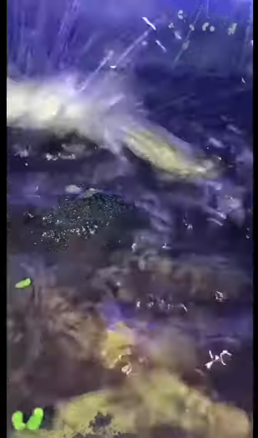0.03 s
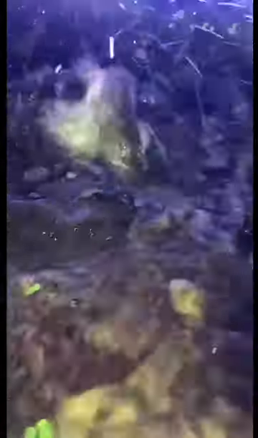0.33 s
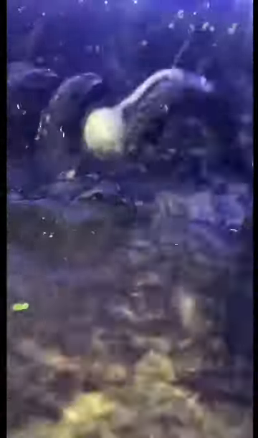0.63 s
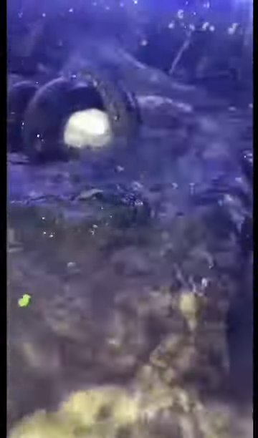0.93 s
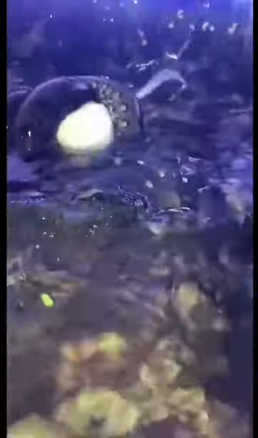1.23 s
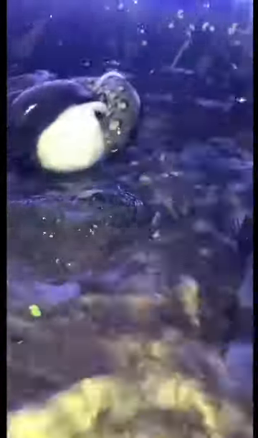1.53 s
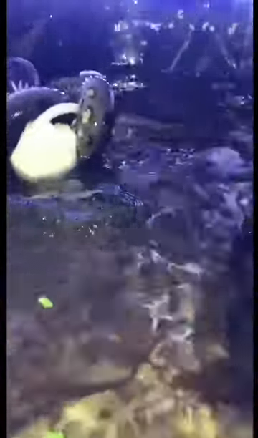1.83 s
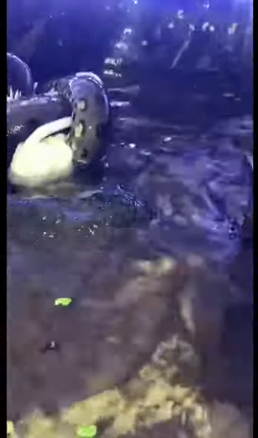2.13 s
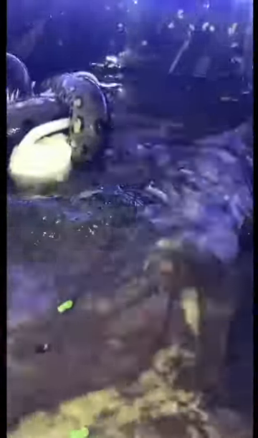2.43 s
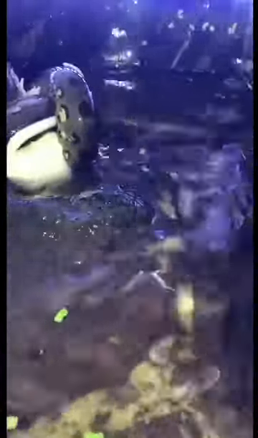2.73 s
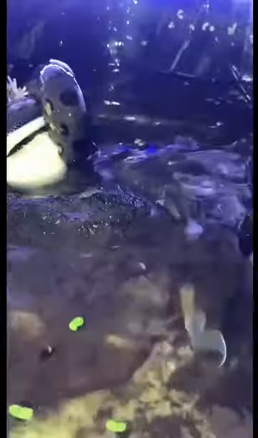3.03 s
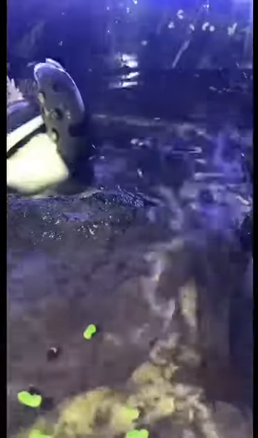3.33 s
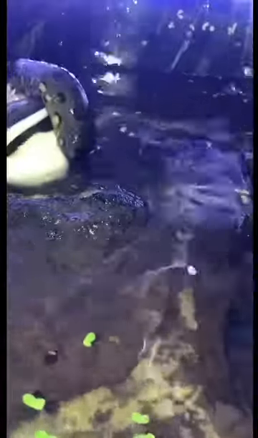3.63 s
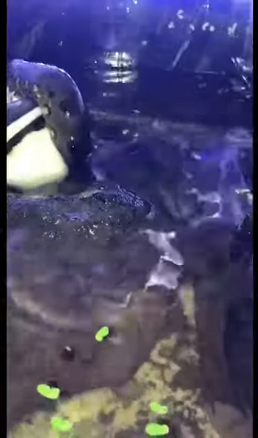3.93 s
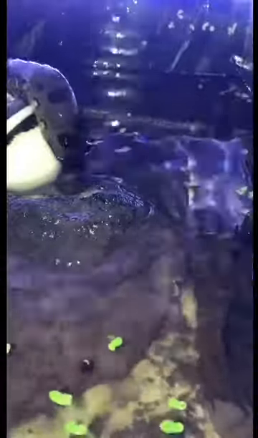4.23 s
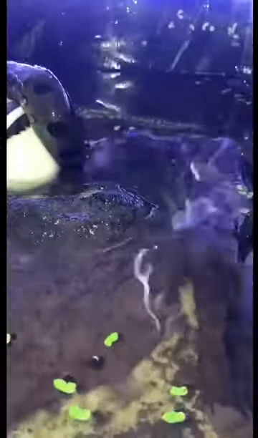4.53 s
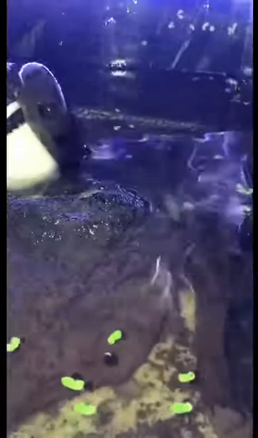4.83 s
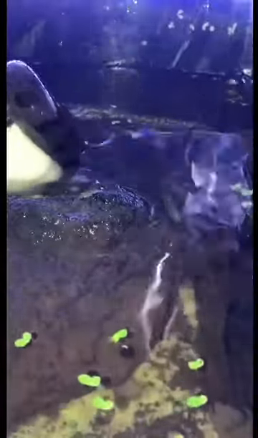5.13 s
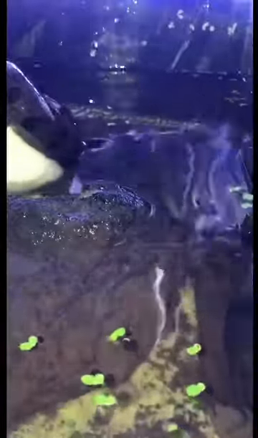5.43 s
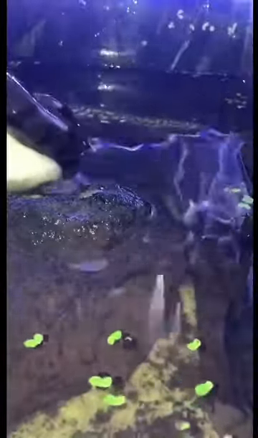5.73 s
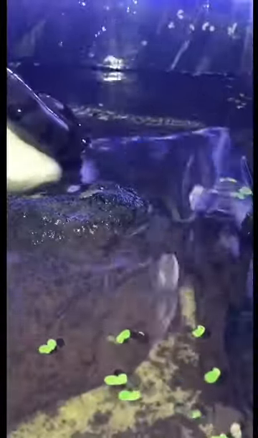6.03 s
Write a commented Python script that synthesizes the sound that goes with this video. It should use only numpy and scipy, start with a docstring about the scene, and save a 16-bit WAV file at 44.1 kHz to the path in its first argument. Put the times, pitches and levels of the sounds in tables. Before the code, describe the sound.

Right at the start, a snake strikes in a small walled pond, heard close up: a loud, sloshing splash breaks into bright spray and bubbles, with several quick thrashes in the first 0.4 seconds. From about 0.6 to 0.8 seconds a high, sputtering hiss comes in spurts, with a whistling ring. Around 1 second the thrown water falls back with a plop, a wet slap and a brief shower of droplets, thinning out by 1.5 seconds. The rest is much quieter. The coiling body makes a soft, low bump just after 2 seconds. A few wet clicks come from 3.3 seconds, ending in a sharp, squeaky one at 3.6. Faint drips tick on sparsely, with small bumps near 4.8 and 6.2 seconds, and ripples lap very faintly. The close walls add a short ring, and low machinery rumbles quietly throughout.

```python
"""A small walled pond, close up. A snake strikes: water sloshes, traps ringing bubbles and tears into spray.
A second hiss follows in spurts, ringing in narrow resonances. The thrown water plops and drips back,
with a few wet clicks and soft bumps of the coiling body, and ripples lap at the wall.
The enclosure rings briefly; machinery rumbles quietly behind it all."""
import sys
import numpy as np
from scipy import signal
from scipy.fft import rfft, irfft, next_fast_len
from scipy.io import wavfile
from scipy.ndimage import map_coordinates

SR = 44100
rng = np.random.default_rng(int(sys.argv[2]) if len(sys.argv) > 2 else 0)


def dump_mix(stems):
    """Bounce the given channels to the path in sys.argv[1] as a 16-bit WAV at rate SR."""
    frames = np.atleast_2d(stems).T  # one column per channel
    limited = np.clip(frames, -1, 1)  # hard clip at full scale
    pcm = np.round(limited * 32767).astype(np.int16)
    wavfile.write(sys.argv[1], SR, pcm)


N = 277212
TIME_S = np.arange(N) / SR
AGE_S = np.arange(SR // 3) / SR  # time within one short event

# Enclosure resonances, lowest first. Each row: centre in Hz, width in Hz, gain in dB.
ENCLOSURE_MODES = [(1002, 26, 5.5), (1185, 19, -4), (1613, 70, -7), (2268, 150, -1), (3070, 43, -3.5),
                   (3250, 19, -1), (3450, 160, 0), (3990, 44, -2.5)]
# Resonances of the ringing hiss. Each row: centre in Hz, width in Hz, gain in dB.
HISS_MODES = [(3040, 210, -24.5), (4540, 250, -25.5), (5430, 90, -18.5), (5968, 190, -2.5), (6180, 78, 6),
              (6360, 140, -4.5), (6900, 120, -14)]


def strike():
    """The lunge shoves water aside; each thrash folds in air and throws spray and mist. Foam simmers on."""
    # Each row: start in seconds, hold in seconds, spray in dB, mist in dB, churn in dB.
    thrashes = [(0.0, 0.015, -27, -27, -19.5), (.025, 0.055, -19, -23.5, -25.5),
                (.08, 0.044, -22.5, -24, -26), (.124, 0.053, -16, -24, -25.5), (.195, 0.043, -23, -33, -40),
                (.221, .022, -18, -36.5, -38), (.27, 0.017, -24, -38.5, -29.5),
                (.393, .025, -36.5, -34, -29), (.974, .014, -48, -56, -31)]
    # Spectra. Each row: frequency in Hz, density in dB.
    spray_spectrum = [(1800, -40), (3000, -4), (4000, -7), (4600, -2), (5400, -0.5), (6500, -1.5),
                      (7500, -5.5), (10000, -31)]
    mist_spectrum = [(4000, -35.5), (6500, -10), (7500, -5.5), (9300, -2.5), (10500, -7.5), (13000, -7),
                     (16000, -7)]
    slosh_spectrum = [(20, -46.5), (40, -23), (60, -4.5), (85, -7.5), (130, -0.5), (190, -5.5), (250, -8),
                      (300, -16), (370, -10), (500, -21), (700, -19), (1100, -39)]
    spray_env, mist_env, churn_env = bursts(thrashes, attack_s=.0073, fall_db_per_s=520)
    foam_env = burst(0, hold_s=.795, attack_s=.0073, fall_db_per_s=480.5)
    spray = froth(per_s=1500, hz=5076, octaves=.4, cycles=18) + .38 * patter(per_s=5000, spread_db=3)
    mist = .87 * patter(per_s=5200, spread_db=4.5) + froth(per_s=1500, hz=8550, octaves=.34, cycles=14)
    slosh = amp(-25.5 - 38.5 * TIME_S) * coloured(rng.standard_normal(N), slosh_spectrum)
    return (np.hypot(spray_env, amp(-52) * foam_env) * coloured(spray, spray_spectrum)
            + np.hypot(mist_env, amp(-50.5) * foam_env) * coloured(mist, mist_spectrum)
            + np.hypot(churn_env, amp(-41.5) * foam_env) * churn() + slosh)


def churn():
    """Larger bubbles and slaps, ringing in the enclosure."""
    # Each row: frequency in Hz, density in dB.
    spectrum = [(200, -21.5), (400, -1.5), (550, -13.5), (850, -18), (1000, -11.5), (1600, -4), (2800, -2),
                (4000, -16), (7000, -40)]
    water = froth(per_s=550, hz=1737, octaves=.6, cycles=14) + 1.3 * patter(per_s=2200, spread_db=4.5)
    return unit(coloured(water, spectrum) + .49 * unit(resonate(water, ENCLOSURE_MODES)))


def sheets():
    """A water sheet stretches and tears: droplet size slides, and with it the pitch of a narrow hiss."""
    # Each row: middle in seconds, length in seconds, start pitch in Hz, end pitch in Hz, level in dB.
    tears = [(0.034, 0.03, 7600, 7500, -20), (.052, 0.068, 6500, 5120, -15.5),
             (0.083, 0.069, 8850, 10420, -21.5), (0.131, 0.087, 8330, 9130, -24.5),
             (.152, 0.072, 4357, 4786, -16.5), (0.241, 0.021, 5220, 5500, -16),
             (0.233, .035, 6293, 7010, -20.5), (0.29, 0.026, 5070, 5700, -27)]
    out = np.zeros(N)
    for mid_s, length_s, start_hz, end_hz, db in tears:
        pitch_hz = np.interp(TIME_S, [mid_s - length_s / 2, mid_s + length_s / 2], [start_hz, end_hz])
        swell = np.cos(np.pi * np.clip((TIME_S - mid_s) / length_s, -.5, .5))
        flutter = wobble(750) + 1j * wobble(750)
        out += amp(db) * swell * np.real(flutter * np.exp(1j * phase(pitch_hz)))
    return out


def ringing_hiss():
    """Spurts of sputtering hiss; narrow resonances and a wavering whistle take over at their height."""
    # Each row: start in seconds, attack in seconds, hold in seconds, ring in dB, sputter in dB.
    spurts = [(.53, .05, .066, -35, -34), (.597, .006, 0.065, -13.5, -25), (.656, .01, 0.024, -9.5, -28),
              (.709, .003, .018, -18.5, -19), (0.773, .012, .022, -37, -34)]
    # Each row: frequency in Hz, density in dB.
    sputter_spectrum = [(1470, -47), (2500, -20.5), (2680, -24), (3080, -3), (3800, -14), (4310, -6.5),
                        (4880, -12.5), (6200, -4), (6750, -13), (7400, -8.5), (9290, -9.5), (10200, -23.5),
                        (10900, -18), (13100, -26), (14900, -22.5), (16000, -28)]
    # Each row: centre in Hz, width in Hz, gain in dB.
    sputter_modes = [(3210, 79, -6.5), (5200, 50, -5), (6100, 75, 0), (7186, 70, -7), (7840, 43, -7.5),
                     (8506, 31, -11), (10850, 140, -18.5), (11754, 120, -21)]
    ring_env, sputter_env = np.zeros((2, N))
    for start_s, attack_s, hold_s, ring_db, sputter_db in spurts:
        ring_spurt = amp(ring_db) * burst(start_s, hold_s, attack_s, fall_db_per_s=600)
        sputter_spurt = amp(sputter_db) * burst(start_s, hold_s, attack_s, fall_db_per_s=430)
        ring_env = np.hypot(ring_env, ring_spurt)
        sputter_env = np.hypot(sputter_env, sputter_spurt)
    whistle_hz = 6210 + 170 * wobble(170)
    whistle = unit(np.sin(phase(whistle_hz)))
    cluster = resonate(rng.standard_normal(N), HISS_MODES)
    cluster = coloured(cluster, [(2000, -12.5), (5000, -1), (8000, 1), (13000, -12.5)])
    ring = unit(cluster + amp(-3) * whistle)
    impacts = patter(per_s=8300, spread_db=5) * amp(1.7 * wobble(120))
    sputter = coloured(impacts, sputter_spectrum)
    sputter += .68 * unit(resonate(rng.standard_normal(N), sputter_modes))
    return ring_env * ring * amp(1.3 * wobble(160)) + sputter_env * sputter


def bubbles():
    """Trapped air splats, then rings and glides up; it rings longer near the lowest enclosure mode."""
    # Each row: start in seconds, level in dB, pitch in Hz.
    air_pockets = [(.008, -7.5, 1547), (.092, -9.5, 1255), (0.292, -21.5, 1170), (.298, -14.5, 1595),
                   (.353, -26, 986), (0.394, -15, 2670), (.407, -19, 1136), (.416, -7.5, 1670),
                   (.478, -27.5, 3350), (.507, -29, 1130), (.716, -13.5, 1380), (.778, -23, 2138),
                   (0.9, -39.5, 2390), (.939, -21.5, 2490), (.967, -7, 626), (0.967, -19, 1015),
                   (.978, -18.5, 2300), (.986, -16, 1970), (1.025, -17, 1793), (1.053, -31, 997),
                   (1.091, -26, 2990), (1.093, -31.5, 2440), (1.137, -33.5, 2293), (1.267, -38, 3470)]
    lowest_mode_hz, sympathy_width_hz = ENCLOSURE_MODES[0][0], 140
    out = np.zeros(N)
    for start_s, db, hz in air_pockets:
        sympathy = np.exp(-((hz - lowest_mode_hz) / sympathy_width_hz) ** 2)
        pitch_hz = hz * (1 + .077 * (1 - np.exp(-AGE_S / .021)))
        ring = decay(t60_s=.035 + .04 * sympathy, attack_s=.0008) * np.sin(phase(pitch_hz))
        splat = amp(-14) * band_noise(hz, octaves=.8) * decay(t60_s=.022, attack_s=.0004)
        add(out, start_s, amp(db - 3.5) * (ring + splat))
    return out


def drops():
    """Each drop hits the surface and ticks in a band set by its size."""
    # Each row: start in seconds, level in dB, band centre in Hz.
    impacts = [(.3452, -26.5, 4030), (0.3612, -26, 6652), (.406, -20.5, 6095), (.918, -33, 10360),
               (0.9293, -31, 5798), (.9462, -23, 4298), (1.0226, -22, 4400), (1.0827, -32, 6300),
               (1.1974, -36, 6660), (1.4005, -28, 7640), (1.4614, -49, 4200), (1.5263, -49, 5900),
               (1.5592, -41.5, 13600), (1.688, -53, 9500), (1.912, -49, 13500), (2.054, -51.5, 6780),
               (2.3224, -47, 12110), (2.5075, -49, 14800), (3.9334, -43, 6200), (4.0738, -52, 9460),
               (4.214, -51.5, 9330), (4.304, -53, 3760), (4.502, -46, 2070), (4.7674, -51.5, 9354),
               (5.7425, -47, 6500), (6.2375, -42.5, 4600)]
    out = np.zeros(N)
    for start_s, db, hz in impacts:
        tick = band_noise(hz, octaves=.29) * decay(t60_s=.029, attack_s=.0004)
        add(out, start_s, amp(db - 5.5) * tick)
    return out


def clicks():
    """Sharp wet clicks, spread over all bands."""
    # Each row: start in seconds, level in dB, tilt in dB per octave, t60 in seconds.
    snaps = [(0.9643, -21, 1, 0.041), (1.022, -23, 0.5, 0.019), (1.135, -33, 3, 0.029),
             (1.2572, -30, 11.5, 0.014), (3.2625, -26.5, 0, .028), (3.409, -50, -0.5, .021),
             (3.3318, -33.5, 13.5, 0.011), (3.58, -17.5, 16.5, .013), (4.502, -51.5, -2.5, 0.031)]
    # Each row: frequency in Hz, density in dB.
    spectrum = [(300, -6), (1000, -4), (2500, 1), (4500, -7), (7000, -5), (11000, -8.5), (16000, -12.5),
                (18000, -45)]
    out = np.zeros(N)
    for start_s, db, tilt, t60_s in snaps:
        snap = shaped_noise(lambda hz: amp(along(spectrum, hz) + tilt * np.log2(hz + 300)))
        add(out, start_s, amp(db) * snap * decay(t60_s, attack_s=.00075))
    return out


def squeaks():
    """Short squeaks on the resonances of the hiss."""
    # Each row: start in seconds, level in dB, attack in seconds, t60 in seconds.
    events = [(3.525, -40.5, 0.04, 0.105), (3.58, -22, 0.00087, .022)]
    out = np.zeros(N)
    for start_s, db, attack_s, t60_s in events:
        ring = unit(resonate(rng.standard_normal(len(AGE_S)), HISS_MODES))
        add(out, start_s, amp(db) * ring * decay(t60_s, attack_s))
    return out


def bumps():
    """The coiling body nudges water and wall: a low thud under a wet slap. The first, loudest row is the plop
    of thrown water falling back."""
    # Each row: start in seconds, thud in dB, slap in dB, thud cutoff in Hz, t60 in seconds.
    nudges = [(.967, -25, -26, 480, 0.07), (1.122, -37.5, -49, 346, .096), (2.092, -29, -45, 310, .11),
              (2.161, -36.5, -75, 85.3, .22), (3.414, -44, -47, 250, 0.07), (3.581, -47, -42.5, 400, 0.064),
              (4.811, -47, -40, 400, 0.046), (6.173, -39.5, -49, 305.8, .073)]
    # Each row: frequency in Hz, density in dB.
    slap_spectrum = [(300, 5), (600, 1.5), (1000, 6), (1700, -2.5), (2500, -11), (4000, -23), (8000, -24),
                     (16000, -60)]
    out = np.zeros(N)
    for start_s, thud_db, slap_db, cutoff_hz, t60_s in nudges:
        thud = amp(thud_db) * shaped_noise(lambda hz: hz / (hz + 90) / (1 + (hz / cutoff_hz) ** 4))
        slap = amp(slap_db) * shaped_noise(lambda hz: amp(along(slap_spectrum, hz)))
        add(out, start_s, (thud + slap) * decay(t60_s, attack_s=.0025))
    return out


def settling():
    """Thrown droplets land in a brief shower and tick on, fading with the time since the throw."""
    thrown_s, start_s, fall_db_per_doubling = .7, .82, 5.5
    ticks = .7 * froth(per_s=460, hz=10000, octaves=.55, cycles=2.5)
    pings = .55 * froth(per_s=68, hz=7450, octaves=.38, cycles=6)
    crackle = .94 * patter(per_s=60, spread_db=4.5)
    droplets = coloured(ticks + pings + crackle, [(1500, -17), (4000, -6), (6500, -4), (16000, -.5)])
    doublings = np.log2(np.maximum((TIME_S - thrown_s) / (start_s - thrown_s), 1))
    droplet_env = (TIME_S > start_s) * amp(-49.5 - fall_db_per_doubling * doublings + 2.2 * wobble(40))
    shower_env = amp(-47) * burst(start_s=.925, hold_s=.055, attack_s=.015, fall_db_per_s=450)
    return droplet_env * droplets + shower_env * patter(per_s=2000, spread_db=4)


def lapping():
    """Fading ripples fold against the wall and stir the enclosure's resonances."""
    # Larger ripples. Each row: middle in seconds, level in dB.
    laps = [(1.3, -65), (1.62, -65.5), (1.87, -69), (2.52, -69.5), (4.25, -72), (4.64, -70), (5.52, -69),
            (5.97, -71)]
    lap_width_s, fall_db_per_doubling = .071, 2.5
    ripple_env = amp(-71 - fall_db_per_doubling * np.log2(np.maximum(TIME_S, 1)) + 2 * wobble(6))
    lap_env = sum(amp(db) * np.exp(-((TIME_S - mid_s) / lap_width_s) ** 2 / 2) for mid_s, db in laps)
    water = coloured(churn(), [(200, 6), (700, 10.5), (1200, -3.5), (2500, -10), (6000, -25)])
    return np.hypot(ripple_env, lap_env) * water


def near_walls(x):
    """x plus the first wall reflections, which thicken small sounds."""
    # Each row: delay in seconds, gain in dB.
    echoes = [(.0013, -12), (.0029, -10), (.0047, -16), (.0072, -18)]
    out = x.copy()
    for delay_s, db in echoes:
        add(out, delay_s, amp(db) * x)
    return out


def wall_reverb(x):
    """The close walls return a short tail that loses its treble first."""
    # Each row: frequency in Hz, t60 in seconds.
    decay_times = [(150, 0.16), (1000, .15), (3000, 0.13), (7000, 0.089), (15000, .08)]
    hz, t_s, noise = signal.stft(rng.standard_normal(SR // 2), SR, nperseg=256)
    fade = amp(-60 * t_s / along(decay_times, hz)[:, None])
    tail = signal.istft(noise * fade, SR, nperseg=256)[1]
    return signal.fftconvolve(x, tail / np.linalg.norm(tail))[:N]


def notches(x):
    """A few narrow dips colour the splashes and small sounds."""
    # Each row: centre in Hz, width in Hz, gain in dB.
    dips = [(485, 17, -6), (830, 79, -5), (1810, 60, -4.5), (10250, 300, -3.5)]
    return filtered(x, lambda hz: amp(sum(db * np.exp(-((hz - centre_hz) / width_hz) ** 2)
                                          for centre_hz, width_hz, db in dips)))


def background():
    """Low machinery rumble and faint, wavering air noise."""
    # Spectra. Each row: frequency in Hz, density in dB.
    rumble_spectrum = [(12, -61.5), (20, -29), (30, -20.5), (41, -3.5), (124, 2), (145, -1.5), (167, -16),
                       (212, -8.5), (238, -12), (290, -20), (344, -15), (445, -23), (492, -34),
                       (600, -32.5), (780, -62.5), (1320, -120)]
    air_spectrum = [(260, -31.5), (450, -1), (492, -13.5), (644, -5), (895, -11), (1010, -7.5),
                    (2160, -17.5), (3430, -17.5), (7470, -24), (9340, -24), (10400, -25.5), (15100, -19.5),
                    (16000, -26)]
    rumble = amp(-49.5) * coloured(rng.standard_normal(N), rumble_spectrum)
    air = amp(-67 + .81 * wobble(6.2)) * coloured(rng.standard_normal(N), air_spectrum)
    return rumble + air


def froth(per_s, hz, octaves, cycles, samples=700):
    """A cloud of small bubbles, each a damped tone that rises as it nears the surface; rms 1."""
    draw = rng.standard_normal((int(per_s * N / SR), 2))
    pitch_hz = np.minimum(hz * 2 ** (octaves * draw[:, :1]), SR / 3)
    turns = pitch_hz * np.arange(samples) / SR
    fade = np.exp(-turns / cycles)
    tones = amp(3 * draw[:, 1:]) * fade * np.sin(2 * np.pi * turns * (1 + .037 * (1 - fade)))
    starts = rng.integers(0, N, (len(draw), 1))
    return unit(np.bincount((starts + np.arange(samples)).ravel(), tones.ravel(), N)[:N])


def patter(per_s, spread_db):
    """Random droplet impacts of uneven size; rms 1."""
    hits = rng.random(N) < per_s / SR
    signs = np.sign(rng.standard_normal(N))
    sizes = amp(spread_db * np.clip(rng.standard_normal(N), -2.5, 2.5))
    return unit(hits * signs * sizes)


def burst(start_s, hold_s, attack_s, fall_db_per_s):
    """Envelope: linear rise, then a fall from hold_s after the start."""
    age_s = TIME_S - start_s
    return np.clip(age_s / attack_s, 0, 1) * amp(-fall_db_per_s * np.maximum(age_s - hold_s, 0))


def bursts(rows, attack_s, fall_db_per_s):
    """One envelope per dB column of (start s, hold s, dB, ..) rows; overlaps add in power."""
    return np.sqrt(sum(np.outer(amp(levels_db), burst(start_s, hold_s, attack_s, fall_db_per_s)) ** 2
                       for start_s, hold_s, *levels_db in rows))


def decay(t60_s, attack_s):
    """Envelope of a blow."""
    return amp(-60 * AGE_S / t60_s) * (1 - np.exp(-AGE_S / attack_s))


def wobble(knots_per_s):
    """Smooth random curve."""
    return map_coordinates(rng.standard_normal(int(N * knots_per_s / SR) + 4), [TIME_S * knots_per_s])


def band_noise(centre_hz, octaves):
    """Short noise in a band; rms 1."""
    return shaped_noise(lambda hz: (1 + (np.log2((hz + 1) / centre_hz) / octaves) ** 2 / 2) ** -2)


def shaped_noise(response):
    """Short noise through a response; rms 1."""
    return unit(filtered(rng.standard_normal(len(AGE_S)), response))


def coloured(x, spectrum):
    """x shaped by (Hz, dB) points; rms 1."""
    return unit(filtered(x, lambda hz: amp(along(spectrum, hz))))


def resonate(x, modes):
    """x through parallel resonances."""
    return filtered(x, lambda hz: sum(
        amp(db) * 1j * hz * width_hz / (centre_hz ** 2 - hz ** 2 + 1j * hz * width_hz)
        for centre_hz, width_hz, db in modes))


def filtered(x, response):
    """x through a gain given as a function of Hz."""
    size = next_fast_len(len(x) + SR // 4)
    return irfft(rfft(x, size) * response(np.fft.rfftfreq(size, 1 / SR)), size)[:len(x)]


def along(points, hz):
    """Interpolate (Hz, value) points on a log axis."""
    knots_hz, values = np.transpose(points)
    return np.interp(np.log(hz + 1), np.log(knots_hz + 1), values)


def add(track, start_s, sound):
    """Mix a sound in at start_s."""
    part = track[round(start_s * SR):][:len(sound)]
    part += sound[:len(part)]


def phase(hz):
    """Running phase in radians."""
    return 2 * np.pi * np.cumsum(hz) / SR


def amp(db):
    """Decibels to gain."""
    return 10 ** (np.asarray(db) / 20)


def unit(x):
    """Scale to rms 1."""
    return x / np.sqrt(np.mean(x ** 2) + 1e-20)


def scene():
    """Splash, hiss and small sounds in the enclosure, over lapping and background; mono."""
    splash = strike() + sheets() + ringing_hiss()
    small = amp(-1) * near_walls(drops() + clicks() + squeaks() + settling()) + bubbles() + bumps()
    walls = amp(-9) * wall_reverb(splash + small) + amp(-18) * resonate(small, ENCLOSURE_MODES)
    return (notches(splash + small + walls) + lapping() + background())[None]


def record(dry):
    """Soft peak limiting, then a steep low-pass."""
    cutoff_hz, edge_hz = 15850, 400
    rounded = dry[0] / (1 + np.abs(dry[0]) ** 6) ** (1 / 6)
    return filtered(rounded, lambda hz: np.clip((cutoff_hz - hz) / edge_hz + .5, 0, 1))[None]


dry = scene()
out = record(dry)
dump_mix(out)
```